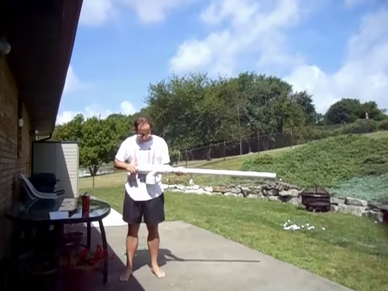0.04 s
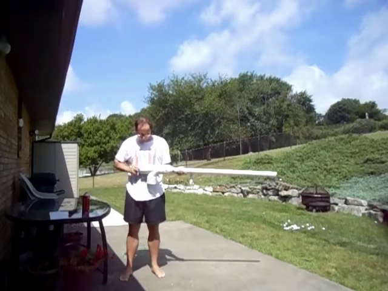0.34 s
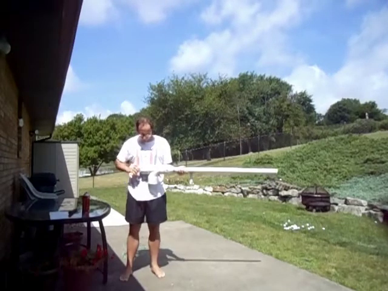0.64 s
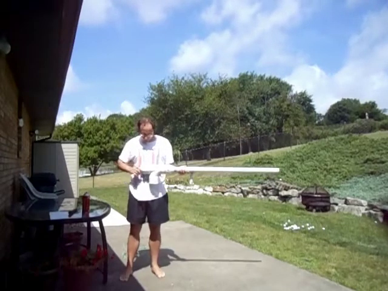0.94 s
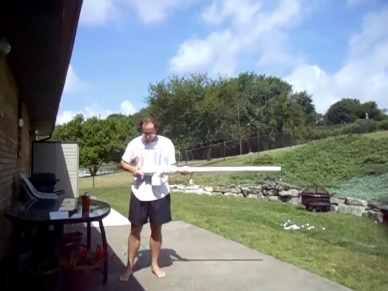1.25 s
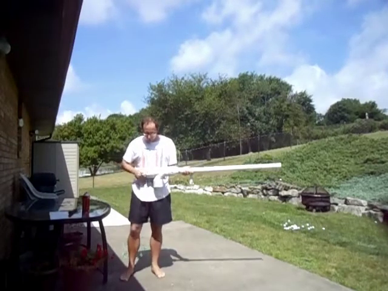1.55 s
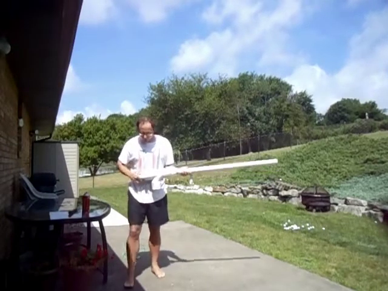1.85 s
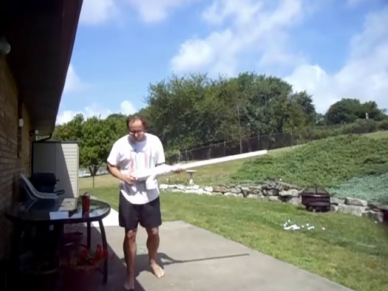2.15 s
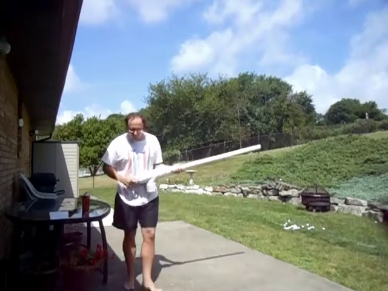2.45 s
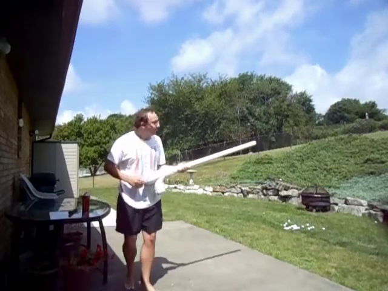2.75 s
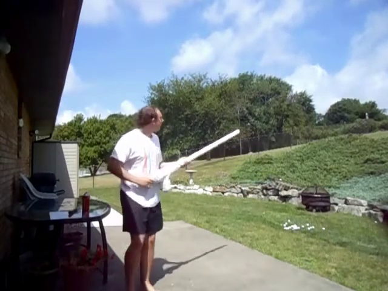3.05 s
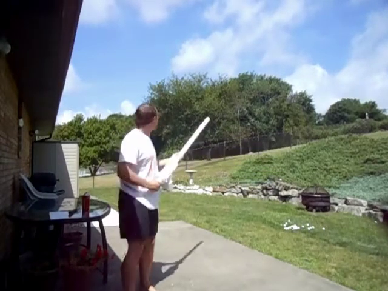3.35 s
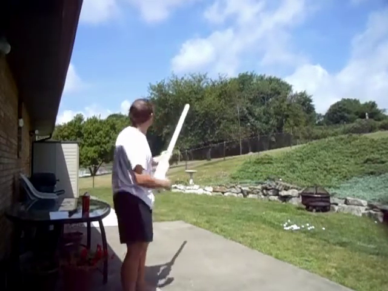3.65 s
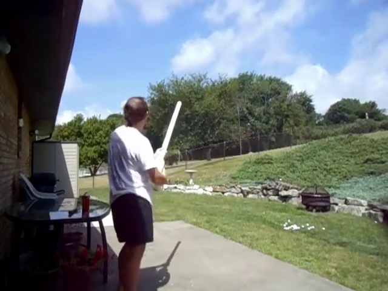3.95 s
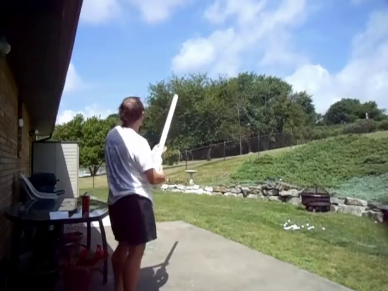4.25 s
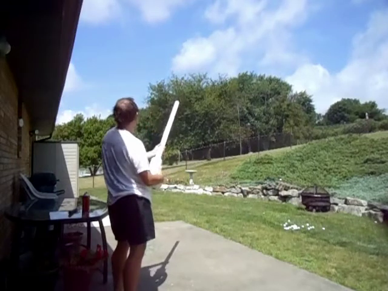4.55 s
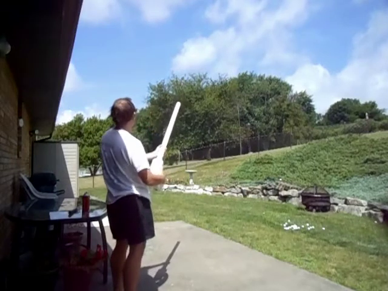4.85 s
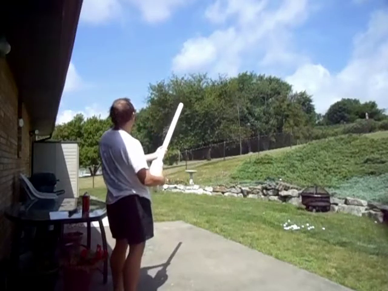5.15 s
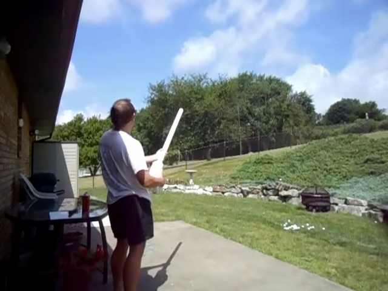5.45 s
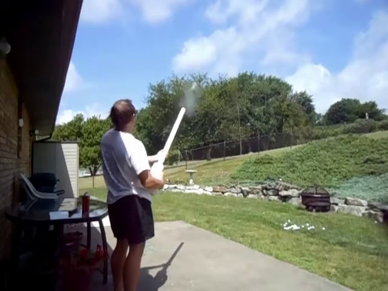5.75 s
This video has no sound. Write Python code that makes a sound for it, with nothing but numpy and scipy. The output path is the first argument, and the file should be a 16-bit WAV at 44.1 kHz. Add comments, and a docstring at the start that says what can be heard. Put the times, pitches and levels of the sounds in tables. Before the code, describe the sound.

Faint knocks on a plastic tube and a few bird chirps in a quiet yard, then a sudden, very loud air launcher blast.

```python
"""A homemade plastic tube air launcher, handled and fired by a man on a patio.
Knocks ring the tube, fittings click and hands rub; a few birds call over a quiet yard.
The valve cracks open and air hisses past the projectile. The muzzle jet roars and the air
columns of barrel and chamber boom, overloading the microphone."""
import sys
import numpy as np
from scipy import signal
from scipy.fft import rfft, irfft, next_fast_len
from scipy.io import wavfile

SR = 44100
rng = np.random.default_rng(int(sys.argv[2]) if len(sys.argv) > 2 else 0)


def output_pcm(signal):
    """Save a mono or channel-first signal as 16-bit PCM at the path in sys.argv[1].

    Samples are clipped to [-1, 1] before scaling.
    """
    pcm = np.clip(np.atleast_2d(signal).T, -1, 1) * 32767
    wavfile.write(sys.argv[1], SR, np.round(pcm).astype(np.int16))


N = 265041
EXIT_S = 5.876  # projectile leaves the barrel
JET_DELAY_S, JET_ATTACK_S = 0.0018, 0.0016  # jet follows it out

# left-right likeness, near sources: f/Hz, correlation
NEAR_CORRELATION = [(100, 0.96), (1000, 1), (3300, 0.96), (7000, 0.65), (11500, 0.17), (14500, 0.19)]
# left-right likeness, diffuse yard sound: f/Hz, correlation
YARD_CORRELATION = [(60, .97), (130, 0.98), (300, 0.51), (1400, 0.49), (3000, 0.43), (7000, 0.23),
                    (14000, 0)]


def amp(db):
    """Decibels to gain."""
    return 10 ** (np.asarray(db) / 20)


def unit(x):
    """Scale to rms 1."""
    return x / np.sqrt(np.mean(x ** 2) + 1e-20)


def read(points, hz):
    """Interpolate a table over log frequency."""
    f, value = np.transpose(points)
    return np.interp(np.log(hz + 1), np.log(f + 1), value)


def add(mix, at_s, sound):
    """Mix in a stereo sound at at_s."""
    start = round(at_s * SR)
    sound = sound[:, max(-start, 0):]
    part = mix[:, max(start, 0):][:, :sound.shape[1]]
    part += sound[:, :part.shape[1]]


def wander(size, span):
    """Smooth random motion, rms 1, changing over about span samples."""
    return unit(signal.oaconvolve(rng.standard_normal(size), signal.windows.hann(span), "same"))


def envelope(t, attack_s, hold_s, fade_db_per_s):
    """Linear attack from t = 0, hold, exponential fade."""
    return np.clip(t / attack_s, 0, 1) * amp(-fade_db_per_s * np.maximum(t - attack_s - hold_s, 0))


def noise(colour, correlation=NEAR_CORRELATION, size=N):
    """Stereo noise, rms 1, of given spectral shape and channel correlation."""
    length = next_fast_len(size + size % 2, True)
    hz = np.fft.rfftfreq(length, 1 / SR)
    mid, side = rfft(rng.standard_normal((2, length)))
    likeness = np.clip(read(correlation, hz), -1, 1)
    mid, side = mid * np.sqrt(1 + likeness), side * np.sqrt(1 - likeness)
    spectrum = np.array([mid + side, mid - side]) * amp(read(colour, hz))
    return unit(irfft(spectrum, length)[:, :size])


def echoes(x, t60, delay_s, correlation=NEAR_CORRELATION):
    """Scattered reflections, each band decaying at its own rate."""
    white = noise([(20, 0), (20000, 0)], correlation, size=SR)
    hz, t, bands = signal.stft(white, SR, nperseg=256)
    tail = signal.istft(bands * amp(-60 * t / read(t60, hz)[:, None]), SR, nperseg=256)[1]
    tail *= np.clip(np.arange(tail.shape[1]) / SR / delay_s - 1, 0, 1)
    return signal.fftconvolve(x, tail / np.linalg.norm(tail[0]), axes=1)[:, :N]


def background(level_db=-46.5, drift_db=0.34, lean_db=0.5):
    """Low outdoor rumble under a faint hiss, slightly stronger on the left."""
    # outdoor spectrum: f/Hz, relative level/dB
    colour = [(12, -46), (20, -7), (58, -0.5), (141, -8.5), (166, -15.5), (237, -22), (265, -21.5),
              (389, -24), (673, -27.5), (989, -26), (1170, -31.5), (1340, -30), (1580, -32.5), (4860, -34),
              (14200, -40.5)]
    level = amp(level_db + drift_db * wander(N, span=30000))
    return level * noise(colour, YARD_CORRELATION) * amp([[lean_db], [-lean_db]])


def rubs(grain_db=3.0):
    """Skin slides on plastic: a soft hiss that catches and slips."""
    # hand slides: t/s, length/s, rms level/dB
    slides = [(-.04, 0.064, -49), (0.433, 0.19, -58.5), (0.843, 0.14, -56.5), (1.172, 0.2, -58),
              (1.549, 0.13, -57.5), (1.94, 0.059, -50.5), (3.639, .09, -67)]
    # friction spectrum: f/Hz, relative level/dB
    colour = [(300, -6), (1000, 10), (3000, 4), (6000, 1.5), (10000, -3.5), (14000, 0)]
    out = np.zeros((2, N))
    for at_s, length_s, db in slides:
        size = int(length_s * SR)
        grip = amp(grain_db * wander(size, span=400))
        swell = np.sin(np.linspace(0, np.pi, size))
        add(out, at_s, amp(db) * unit(noise(colour, size=size) * grip * swell))
    return out


def knocks(rise_s=0.0036, detune=0.017, spot_db=3.0):
    """Brief scraping contacts ring the damped modes of the tube."""
    # knocks and scuffs: t/s, peak level/dB, treble re middle/dB, contact decay/s
    contacts = [(.001, -32.5, -11.5, 0.0084), (.072, -40.5, -9, .008), (.089, -42, -20, 0.004),
                (.137, -41.5, -9, .008), (.154, -43, -21, 0.0061), (0.3244, -24.5, -3, 0.0032),
                (.342, -50, -10, .005), (.377, -37, -10, 0.0028), (0.5806, -31.5, -5, 0.0045),
                (.658, -39.5, -28, 0.0055), (.832, -42, -12, .014), (.875, -31.5, -5, 0.0097),
                (.8945, -30.5, -3, 0.0066), (1.061, -43, -15, 0.019), (1.136, -33.5, -13, 0.0025),
                (1.149, -39.5, -6, .006), (1.178, -34.5, -12, 0.0063), (1.1896, -22, 8, 0.0055),
                (1.228, -26.5, 0, 0.005), (1.272, -38.5, 1, .007), (1.304, -33.5, -7, .0097),
                (1.331, -33.5, -3, 0.009), (1.5714, -35.5, -7, .006), (1.608, -41.5, -16, .007),
                (1.631, -34, -10, 0.0095), (1.973, -29.5, -7, 0.013), (1.9855, -27.5, 6, 0.0029)]
    # tube resonances: f/Hz, width/Hz, relative level/dB
    modes = [(223, 190, -9), (346, 93, -5), (410, 69, -3), (714, 185, -5.5), (988, 113, 1),
             (1317, 108, -1.5), (1594, 65, -3.5), (1780, 170, -6), (2450, 390, -5), (3150, 240, -9),
             (4030, 740, -16.5), (5600, 2000, -30.5)]
    out, t = np.zeros((2, N)), np.arange(4096) / SR
    hz = np.fft.rfftfreq(len(t), 1 / SR)
    for at_s, db, treble_db, contact_s in contacts:
        scrape = noise([(1000, 0), (3500, treble_db)], size=len(t))
        force = scrape * np.minimum(t / rise_s, 1) * np.exp(-t / contact_s)
        grip = 1 + detune * rng.standard_normal()  # hands detune the tube
        favour_db = spot_db * rng.standard_normal(len(modes))  # each spot favours other modes
        body = 0
        for k, (mode_hz, width_hz, mode_db) in enumerate(modes):
            damping = 1j * hz * width_hz
            resonance = damping / ((mode_hz * grip) ** 2 - hz ** 2 + damping)
            body += (-1) ** k * amp(mode_db + favour_db[k]) * resonance
        ring = irfft(rfft(force) * body)
        add(out, at_s, amp(db) * ring / abs(ring).max())
    return out


def clicks(rise_s=0.00094, decay_s=0.0044):
    """Small hard fittings snap with almost no ring."""
    # fitting clicks: t/s, peak level/dB, centre f/Hz, width/octaves
    snaps = [(.582, -36.5, 9000, 0.93), (.616, -36.5, 12500, .25), (1.19, -34, 2750, 0.64),
             (1.229, -36.5, 3500, 0.86), (4.343, -42.5, 4000, 1), (5.398, -28.5, 2400, 0.6)]
    out, t = np.zeros((2, N)), np.arange(2048) / SR
    for at_s, db, hz, octaves in snaps:
        band = [(hz * 2 ** (octaves * k), -2.6 * k ** 2) for k in range(-5, 6)]
        snap = noise(band, size=len(t)) * np.minimum(t / rise_s, 1) * np.exp(-t / decay_s)
        add(out, at_s, amp(db) * snap / abs(snap).max())
    return out


def whistle(hz, level, rasp, waver=0.0093):
    """Bird tone on a pitch curve; rasp spreads hoarse noise around it."""
    size = len(hz)
    phase = 2 * np.pi * np.cumsum(hz * (1 + waver * wander(size, span=200))) / SR
    hoarse = wander(size, span=70) * np.cos(phase) + wander(size, span=70) * np.sin(phase)
    return np.tile(level * (np.sin(phase) + rasp * hoarse), (2, 1))


def birds(squeak_echo_db=-13):
    """Far birds chirp and a near one squeaks; trees and slope scatter the calls."""
    # far chirps: t/s, length/s, level/dB, first f/Hz, last f/Hz, bend (high = early), echo gain/dB
    chirps = [(.66, 0.048, -65.5, 5350, 4260, 3.5, -2), (.74, .02, -59, 4580, 4450, 1, -11),
              (1.054, 0.06, -47, 4980, 3440, 1.7, -15), (2.689, 0.16, -63, 1362, 1489, 1.5, 3),
              (3.48, 0.2, -71.5, 1332, 1348, 0.5, 2), (3.004, 0.046, -58.5, 4940, 3500, 1.2, -4),
              (3.125, 0.041, -64, 4500, 3530, 4, -5), (4.31, .06, -62, 5120, 4060, 1.5, -5),
              (4.47, 0.0356, -64, 4634, 3800, 1.5, -4), (5.275, 0.039, -51.5, 1730, 1310, -1.5, -8),
              (5.28, 0.03, -61, 2910, 2250, -1.5, -5)]
    # near calls: t/s, level/dB, pitch factor, flick delay/s
    squeaks = [(1.953, -42, .988, .079), (4.752, -41.5, 1.002, .085)]
    # yard reverberation: f/Hz, T60/s
    yard_t60 = [(500, 0.16), (2500, 0.24), (4100, 0.56), (7200, 0.32), (14000, 0.034)]
    direct, scattered = np.zeros((2, 2, N))
    for at_s, db, pitch, flick_s in squeaks:
        add(direct, at_s, amp(db) * squeak(pitch, flick_s))
    scattered += amp(squeak_echo_db) * direct
    for at_s, length_s, db, first_hz, last_hz, bend, echo_db in chirps:
        progress = np.linspace(0, 1, int(length_s * SR))
        hz = first_hz + (last_hz - first_hz) * np.expm1(-bend * progress ** 2) / np.expm1(-bend)
        note = whistle(hz, amp(db) * np.sin(np.pi * progress), rasp=0.39)
        add(direct, at_s, note)
        add(scattered, at_s, amp(echo_db) * note)
    return direct + echoes(scattered, yard_t60, 0.0055, YARD_CORRELATION)


def squeak(pitch, flick_s, glide_s=0.019, clear_s=0.035, size=14000):
    """A bird's two voices slide up, clear and fade; the lower lingers under a hoarse falling flick."""
    # two voices and their sum tone, before pitch factor and call level:
    # first f/Hz, top f/Hz, level/dB, attack/s, hold/s, fade/(dB/s)
    voices = [(1755, 4140, -.5, 0.033, 0.021, 620), (4599.7, 7190, -2.5, 0.015, 0.032, 500),
              (10800, 11330, -21, .034, .018, 330)]
    out, t = np.zeros((2, size)), np.arange(size) / SR
    rasp = 0.93 * np.exp(-t / clear_s)
    glide_left = np.exp(-(t / glide_s) ** 2.45)
    for k, (first_hz, top_hz, db, attack_s, hold_s, fade) in enumerate(voices):
        level = amp(db) * envelope(t, attack_s, hold_s, fade)
        if k == 0:
            linger = amp(-15) * envelope(t, attack_s, hold_s=0.14, fade_db_per_s=280)
            level = np.maximum(level, linger)
        out += whistle(pitch * (top_hz + (first_hz - top_hz) * glide_left), level, rasp)
    flick_hz = pitch * (2180 + (3950 - 2180) * np.exp(-t / 0.00404))
    flick_level = amp(-2.5) * envelope(t, attack_s=0.0019, hold_s=0.0053, fade_db_per_s=1500)
    add(out, flick_s, whistle(flick_hz, flick_level, rasp=0.81))
    return out


def valve(attack_s=0.00054, near_mouth_s=5.857, growth_db_per_s=480):
    """The valve cracks open; air leaks past the projectile, louder near the mouth, until the jet."""
    # unseating spit, then full opening: t/s, level/dB, hold/s, fade/(dB/s)
    bursts = [(5.8103, -28.5, 0.021, 1000), (5.812, -5.5, 0.0029, 4000)]
    # crack spectrum: f/Hz, relative level/dB
    crack_colour = [(100, -34), (400, -17), (1200, -9), (1850, 3), (2400, -6.5), (3300, 1.5), (4600, -6),
                    (7500, -2.5), (10500, -2), (13000, 3.5), (14500, -17)]
    # leak spectrum: f/Hz, relative level/dB
    leak_colour = [(100, -8), (500, -5), (1300, -4), (2300, 0), (3300, 5), (4300, -2), (8000, -9),
                   (14000, -8)]
    t = np.arange(N) / SR
    open_s = bursts[-1][0]
    crack = sum(amp(db) * envelope(t - at_s, attack_s, hold_s, fade) for at_s, db, hold_s, fade in bursts)
    deep = amp(-29) * envelope(t - open_s, attack_s, hold_s=0, fade_db_per_s=170)
    near = amp(-26.5) * envelope(t - near_mouth_s, attack_s, hold_s=0, fade_db_per_s=-growth_db_per_s)
    leak = np.hypot(deep, near) * (t < EXIT_S + JET_DELAY_S + JET_ATTACK_S)
    return crack * noise(crack_colour) + leak * noise(leak_colour)


def muzzle(pop_hz=550, pop_glide_s=0.00162, pop_peak_s=0.0011, empty_s=0.058, boom_rise_s=0.0078):
    """Exit pop, a turbulent jet dying with chamber pressure, and booming air columns."""
    # air modes of chamber and barrel: f/Hz, level/dB, decay/s
    modes = [(48.3, -5, .14), (105.2, -20, 0.048), (177, -16.5, 0.051), (340.3, -11, 0.031)]
    # reflections off slope and trees: f/Hz, T60/s
    slope_t60 = [(200, 0.42), (4000, 0.48), (14000, 0.67)]
    t = np.maximum(np.arange(N) / SR - EXIT_S, 0)
    pressure = np.clip((t - JET_DELAY_S) / JET_ATTACK_S, 0, 1) * np.exp(-(t / empty_s) ** 2.4)
    # jet spectrum: f/Hz, relative level/dB
    jet_colour = [(28, 12), (110, 11.5), (230, -3.5), (370, 4), (560, -3), (1000, -0.5), (1400, -1),
                  (3000, 0), (4600, -0.5), (5800, -4.5), (9000, -3), (14000, -4)]
    gusts = amp(3 + 1.5 * wander(N, span=300))
    jet = pressure * gusts * noise(jet_colour)
    cycles = pop_hz * t * (1 + t / pop_glide_s / 2)  # air column ahead shortens: pitch rises
    pop = amp(-6) * t / pop_peak_s * np.exp(1 - t / pop_peak_s) * np.sin(2 * np.pi * cycles)
    boom = sum(amp(db) * np.exp(-t / decay_s) * np.sin(2 * np.pi * hz * t) for hz, db, decay_s in modes)
    boom *= 1 - np.exp(-t / boom_rise_s)
    thrown_back = amp(-18) * echoes(jet, slope_t60, delay_s=0.045)
    return jet + thrown_back + pop - boom


def scene():
    """Launcher, birds and yard; house wall and eaves reflect the handling and the valve."""
    # patio reverberation: f/Hz, T60/s
    patio_t60 = [(200, 0.23), (1000, 0.14), (3000, 0.14), (8000, 0.2), (14000, 0.12)]
    handling = knocks() + clicks() + rubs()
    release = valve()
    patio = echoes(amp(-7) * handling + amp(-12.5) * release, patio_t60, delay_s=0.0028)
    return handling + release + patio + muzzle() + birds() + background()


def record(dry, ceiling=0.82, knee=5.3, cutoff_hz=14300):
    """Microphone overload on the blast: soft clip, then low-pass."""
    clipped = dry / (1 + abs(dry / ceiling) ** knee) ** (1 / knee)
    low_pass = signal.firwin(511, cutoff_hz, window=("kaiser", 9), fs=SR)
    return signal.oaconvolve(clipped, low_pass[None], "same")


dry = scene()
out = record(dry)
output_pcm(out)
```